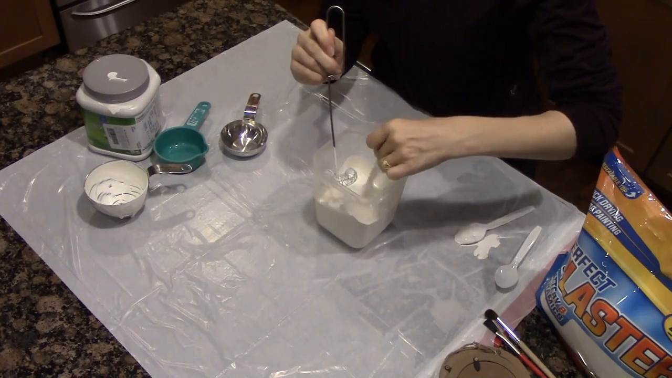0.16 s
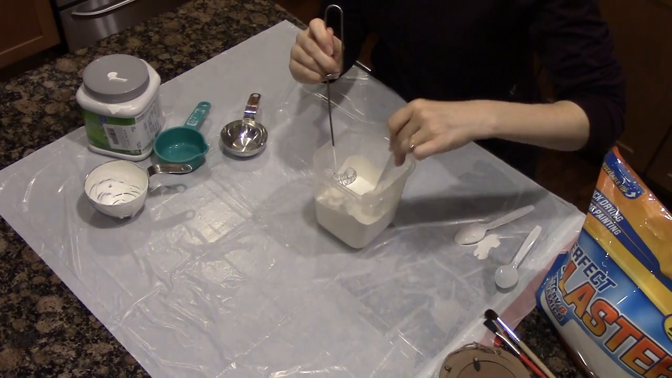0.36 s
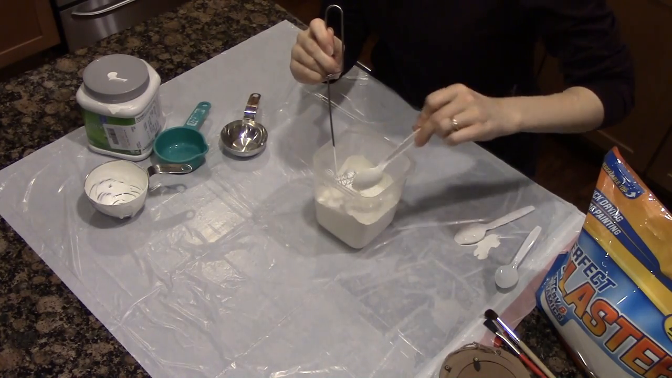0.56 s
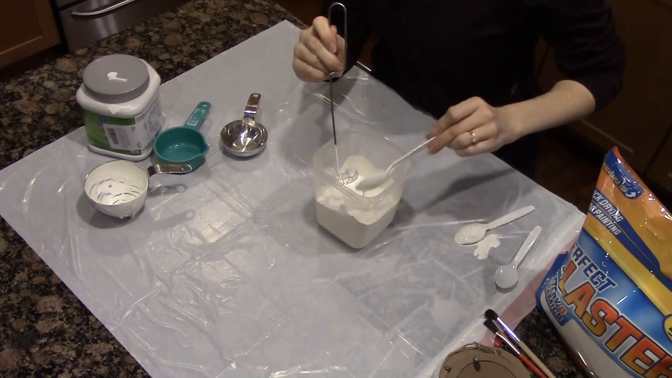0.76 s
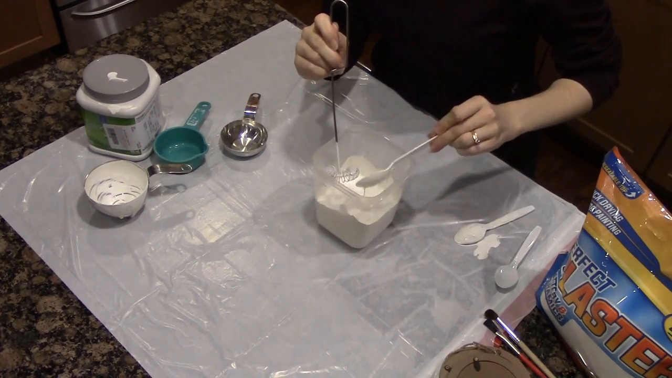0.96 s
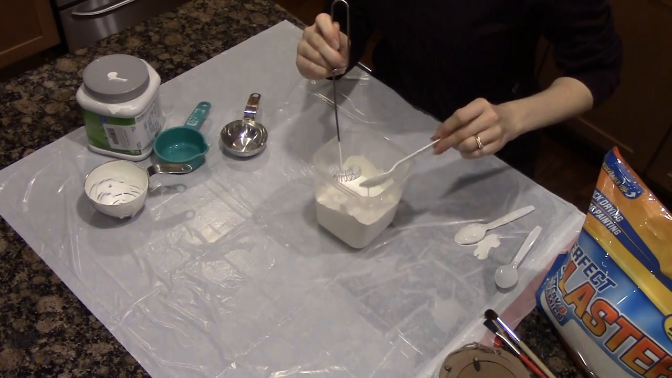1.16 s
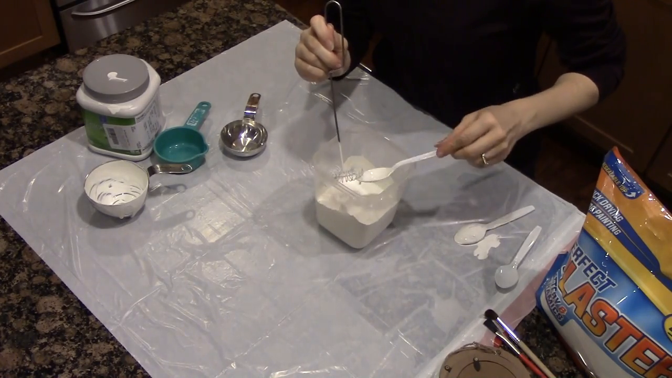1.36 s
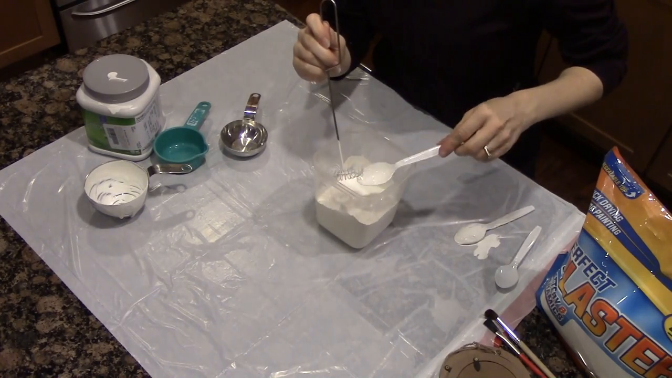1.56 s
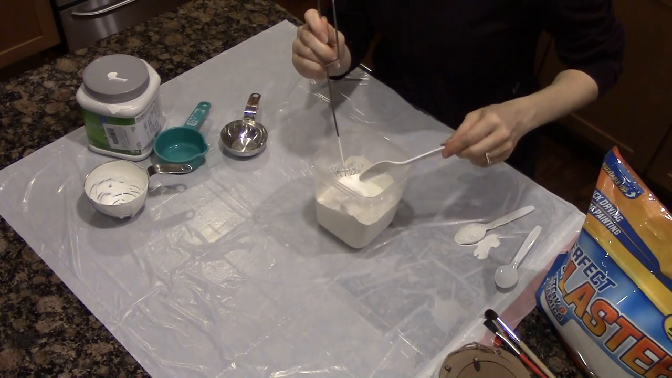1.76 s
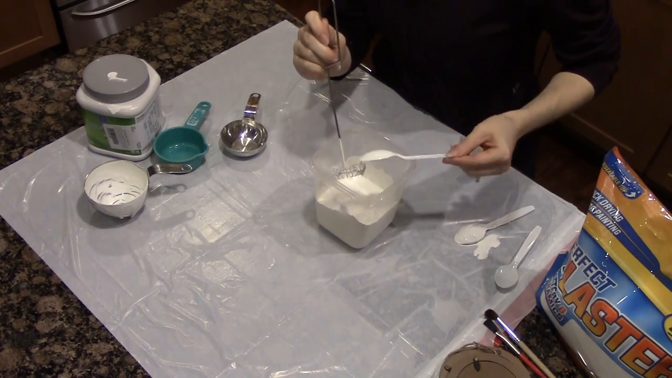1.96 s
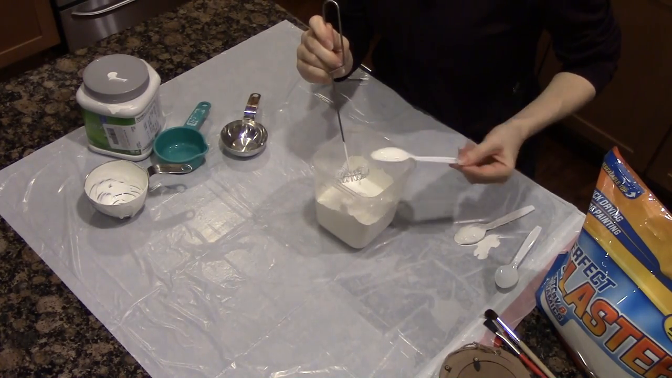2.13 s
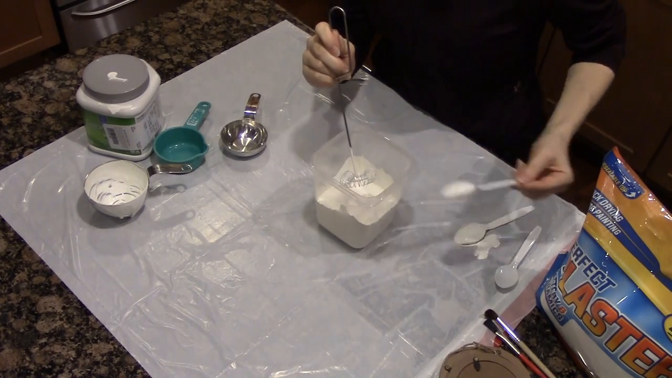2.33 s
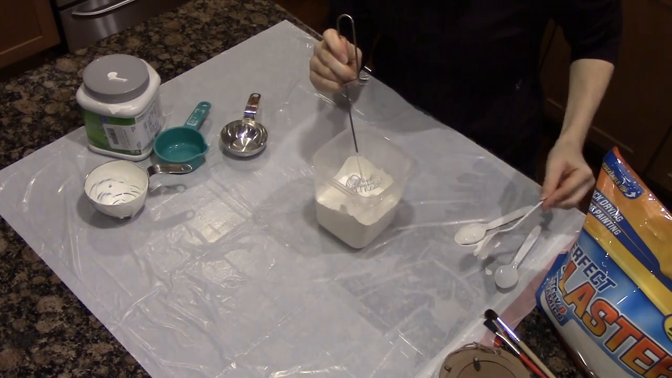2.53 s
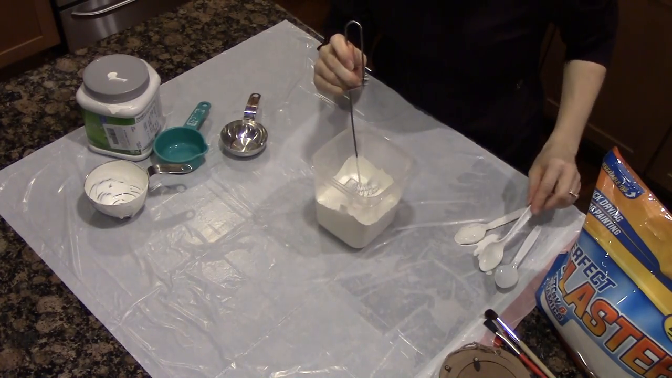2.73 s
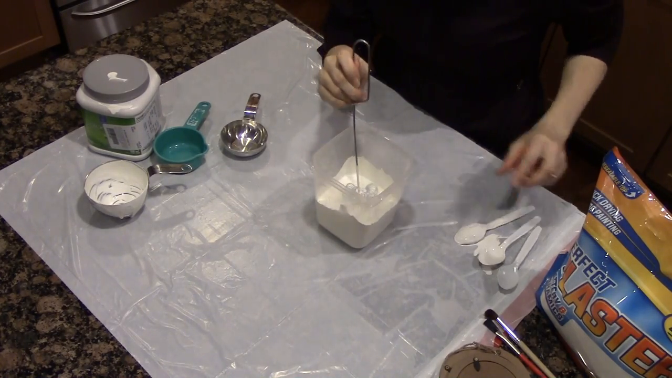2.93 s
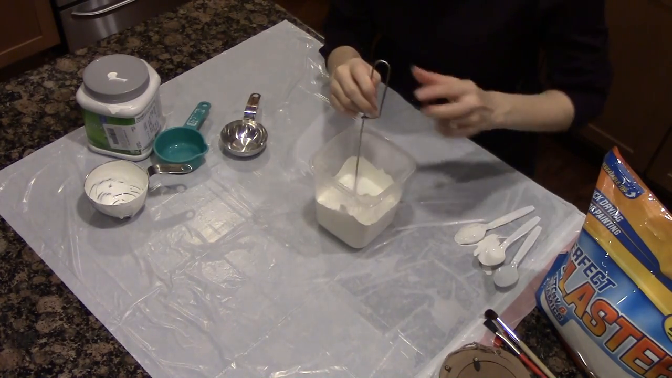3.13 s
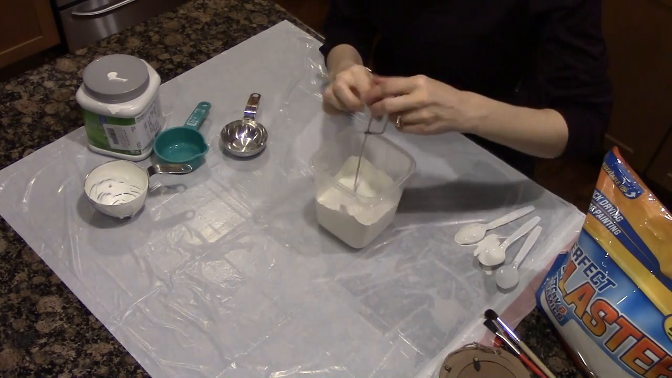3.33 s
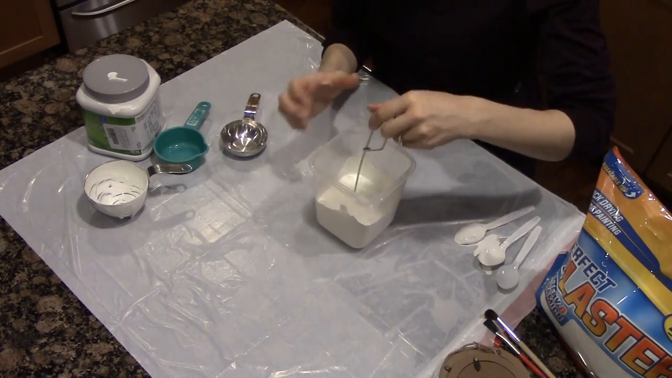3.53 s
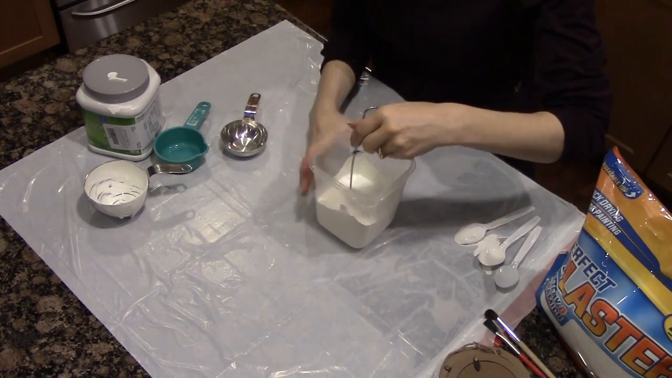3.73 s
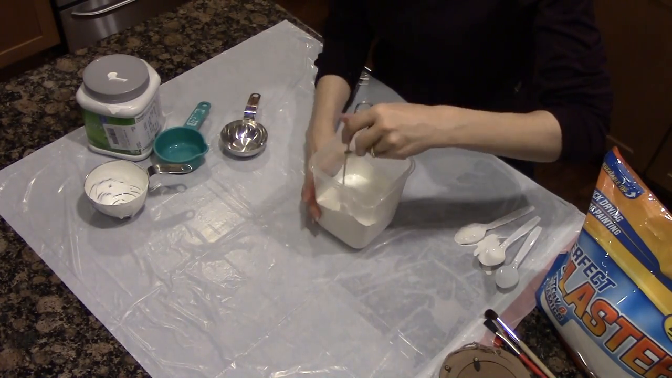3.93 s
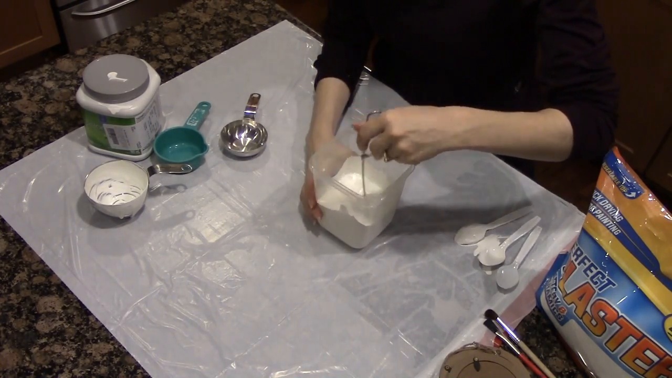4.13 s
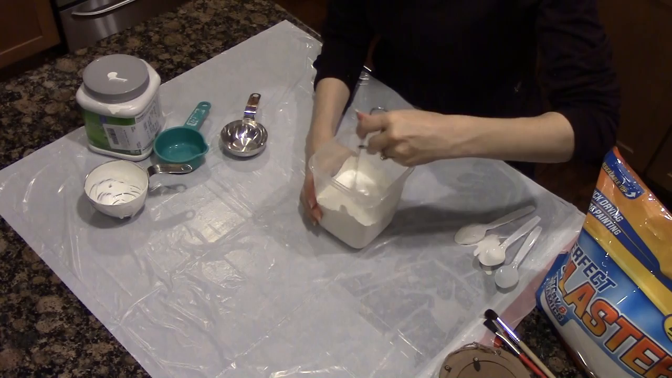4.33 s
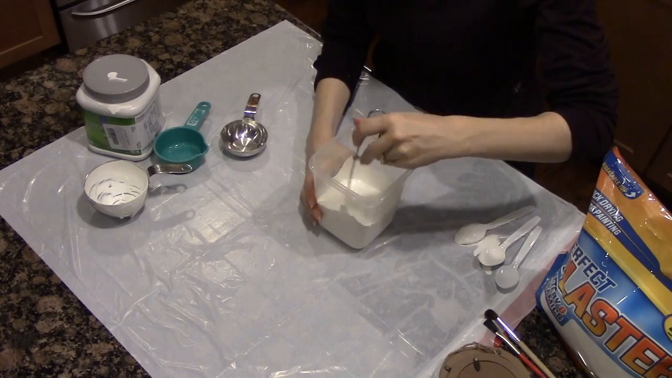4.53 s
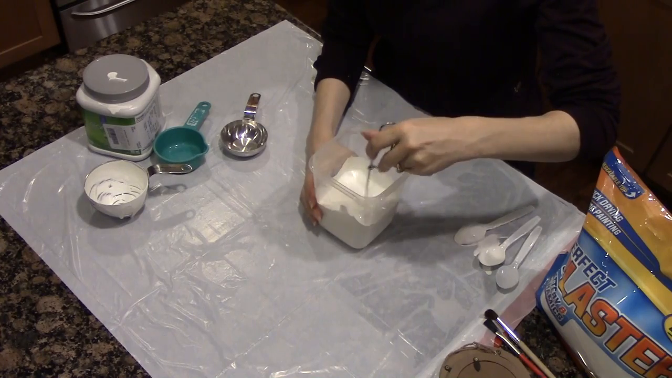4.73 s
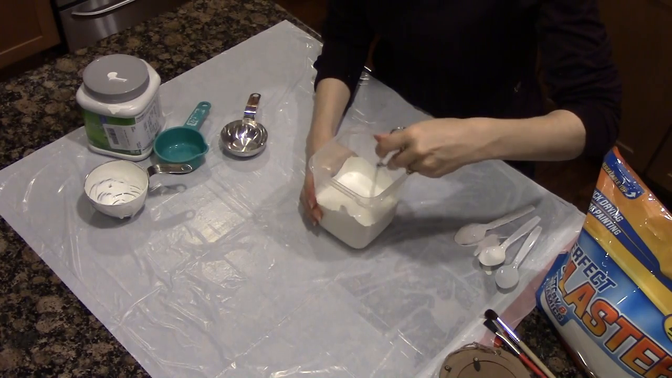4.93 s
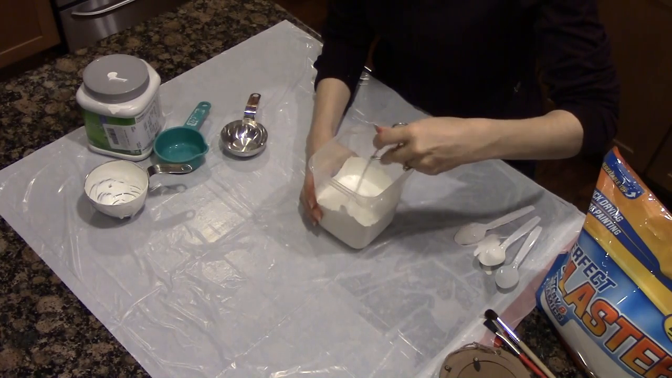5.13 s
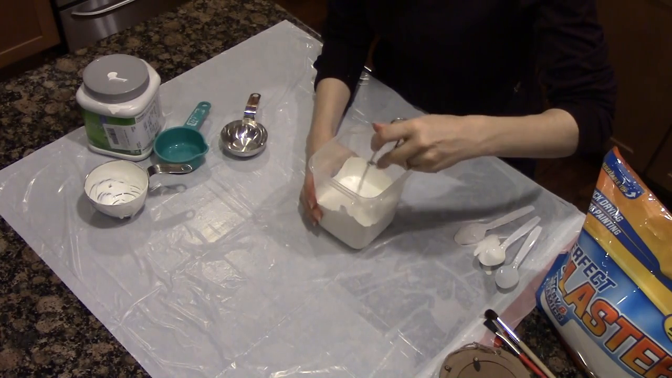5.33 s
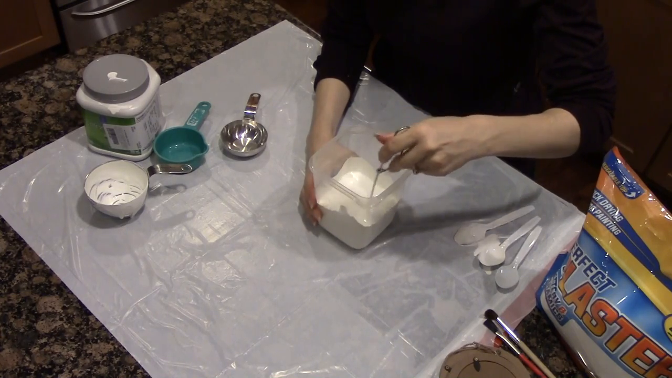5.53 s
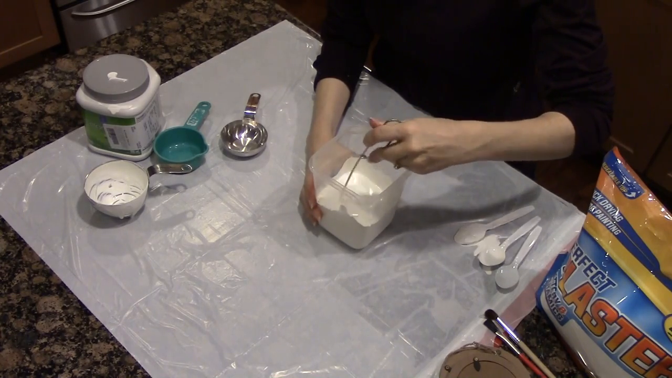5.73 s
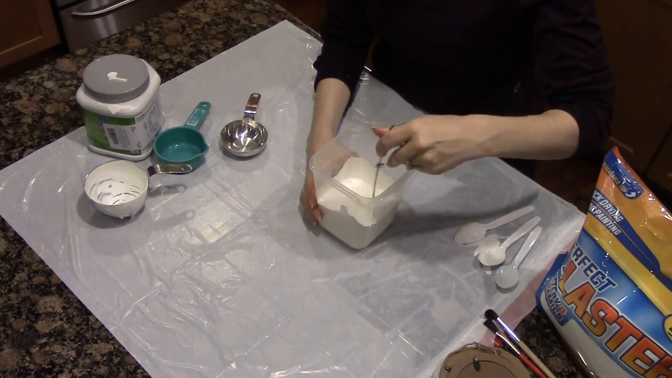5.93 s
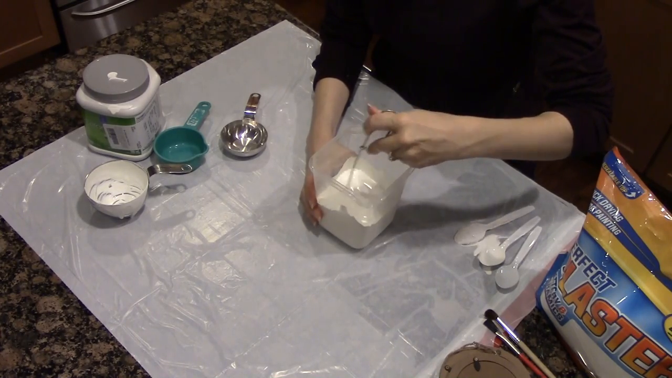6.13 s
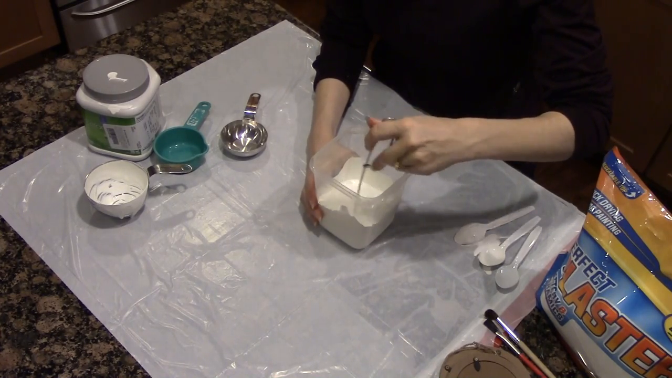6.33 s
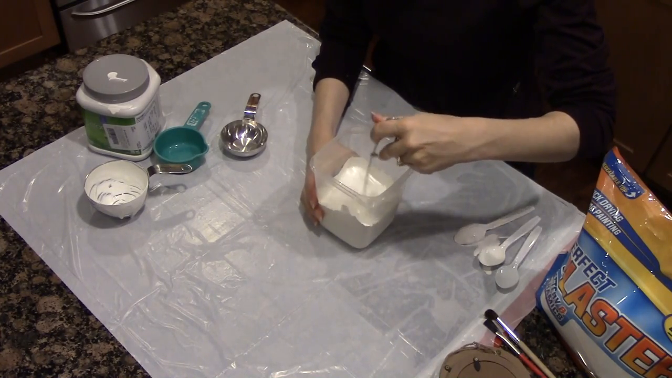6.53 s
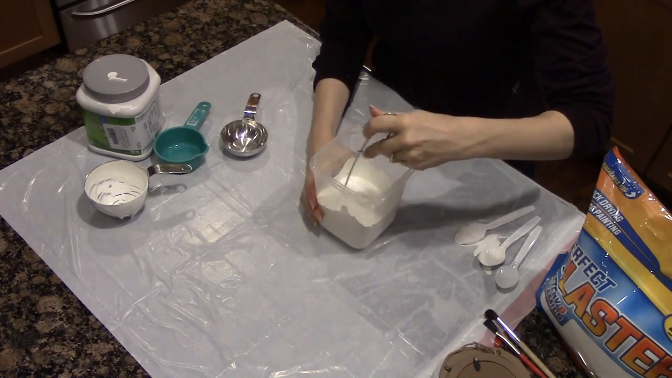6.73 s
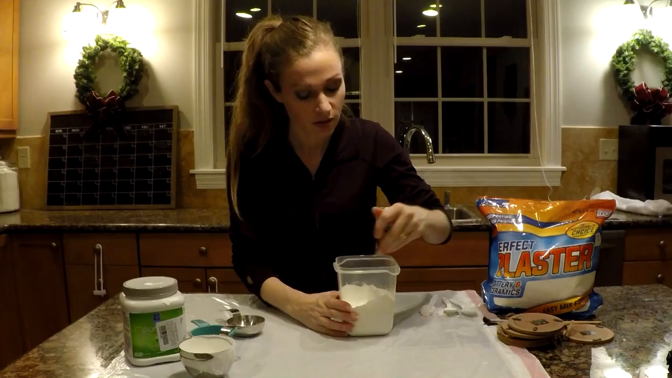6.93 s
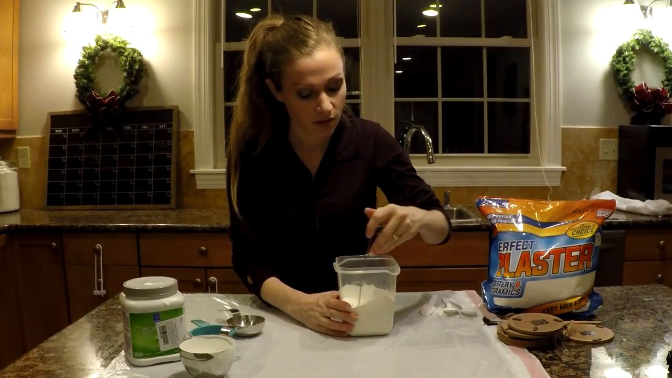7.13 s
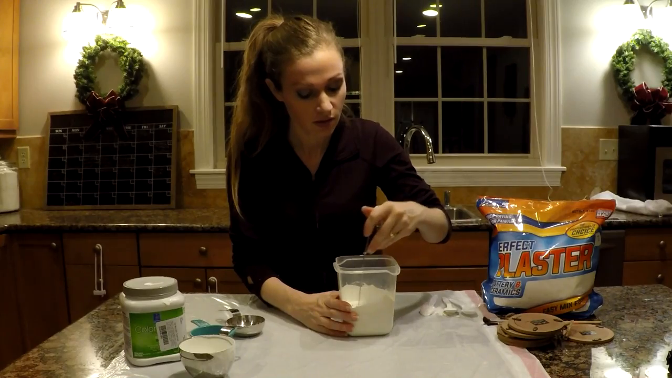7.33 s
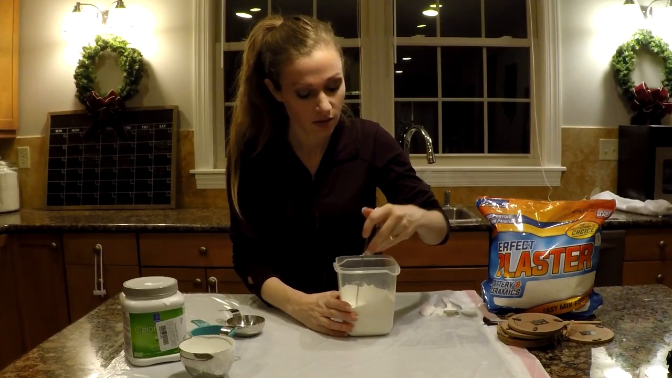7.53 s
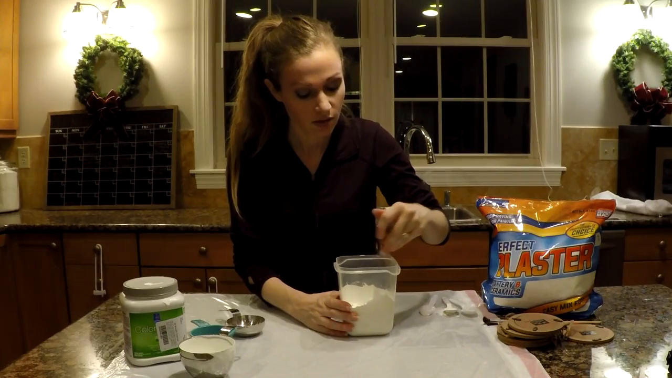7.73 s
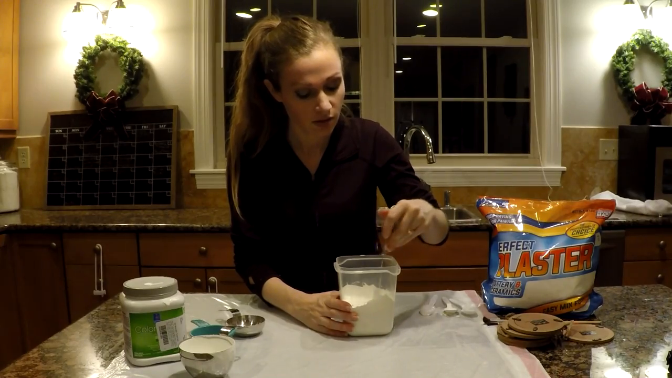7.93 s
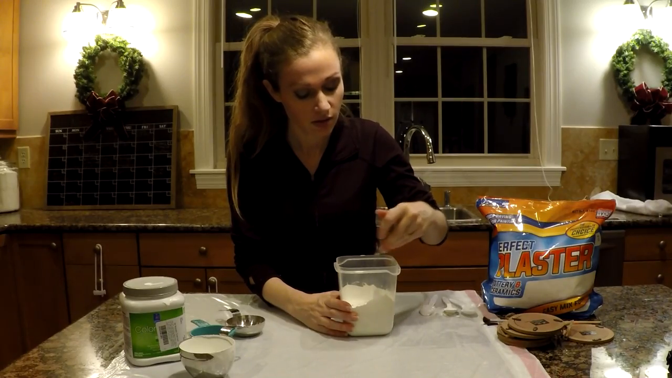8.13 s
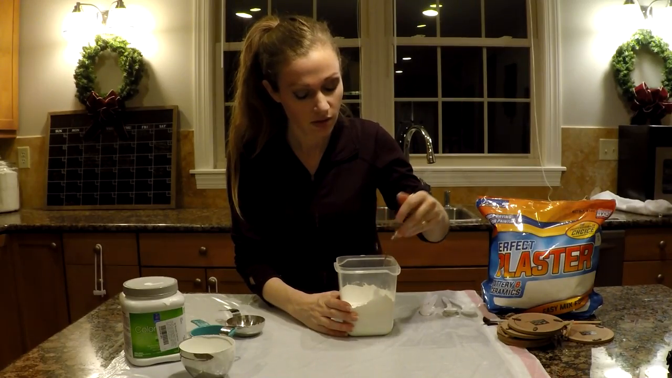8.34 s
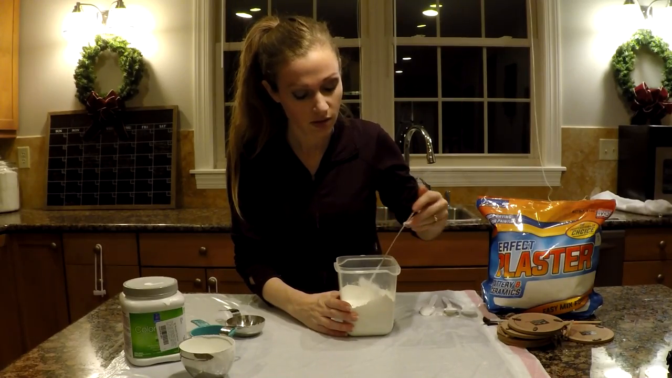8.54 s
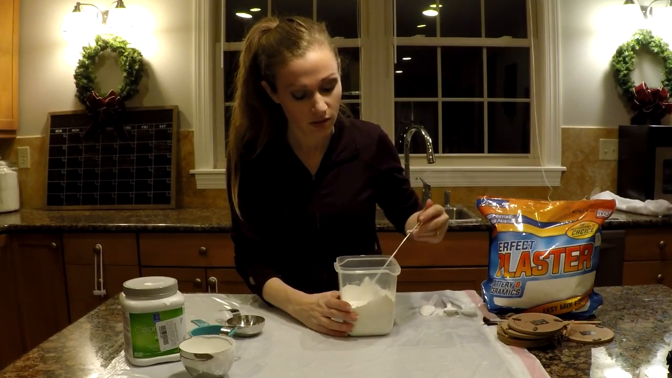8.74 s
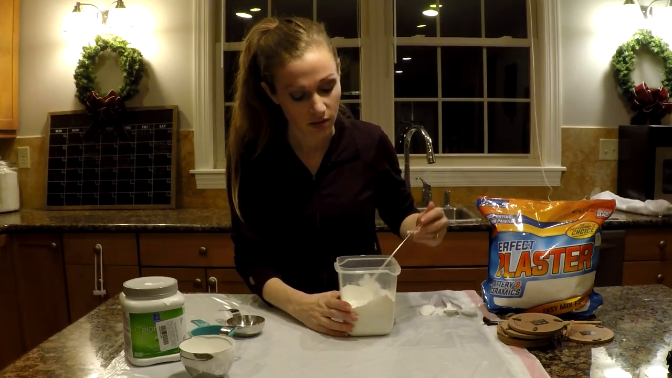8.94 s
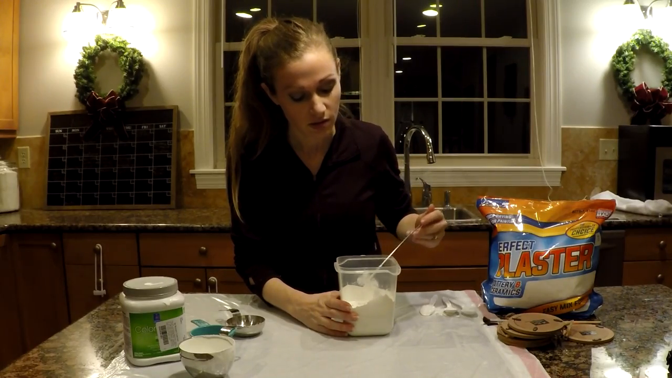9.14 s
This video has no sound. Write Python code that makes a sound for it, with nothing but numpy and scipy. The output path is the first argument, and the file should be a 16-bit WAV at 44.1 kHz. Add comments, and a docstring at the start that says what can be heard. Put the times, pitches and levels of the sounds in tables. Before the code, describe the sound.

A faint steady hum and hiss fill a slightly reverberant kitchen. Between about 0.7 and 1.2 seconds a plastic spoon knocks lightly four times on a plastic tub, with small ticks and faint rubs against whisk wires until 1.6 seconds. Near 2.8 seconds the spoon drops among other spoons with a short, bright clatter. After a couple of soft touches, a wire whisk starts stirring thick paint at about 3.9 seconds. It ticks and clacks unevenly against the tub walls, several times a second, over light scraping and occasional small wet squelches. The stirring eases briefly around 7 seconds, resumes and stops near 8.2 seconds. From 8.7 to 9.1 seconds the whisk raps the rim three times, sharply, with a slight thump through the counter, followed by two faint ticks. The sound is nearer and brighter at first, gradually becoming duller and more distant by about 6 seconds.

```python
"""On a kitchen counter, a plastic tub of thick paint. A plastic spoon is knocked clean on tub and whisk
and dropped among other spoons; a wire whisk then stirs and is rapped three times on the rim. Impacts and
stick-slip friction excite the damped modes of tub, wires and spoons; pockets in the paint resonate as
they close. A far mono microphone hears the room; a near, thinner stereo pair lags 44 ms and fades out."""
import sys
import numpy as np
from scipy import signal
from scipy.fft import rfft, irfft, next_fast_len
from scipy.io import wavfile
from scipy.ndimage import uniform_filter1d

SR = 44100
rng = np.random.default_rng(int(sys.argv[2]) if len(sys.argv) > 2 else 0)


def wrap_up_sound(samples):
    """Save the sound to the file named by the first command line argument, as 16-bit audio."""
    columns = np.atleast_2d(samples).T
    # keep every value between -1 and 1, then stretch to whole-number steps
    tamed = np.clip(columns, -1, 1)
    steps = np.round(tamed * 32767).astype(np.int16)
    wavfile.write(sys.argv[1], SR, steps)


N = 409245
GRIP_S = 2.6   # a hand grips the tub

# Modes of the tub with the whisk in it: f/Hz, level/dB, T60/s
TUB_MODES = [(136, -5.5, 0.094), (283, -18.5, 0.2), (321.7, 2, 0.035), (414, 1, 0.021), (564, 10.5, 0.0058),
             (740, -11.5, 0.17), (855, 12, 0.014), (866, -13.5, 0.11), (902, -14.5, 0.072),
             (952, -15, 0.26), (774, -17, .1), (946, -5.5, 0.0082), (1265, 7.5, 0.01), (1523, -1.5, 0.0072),
             (1578, 6.5, 0.0062), (1867, 8, 0.0031), (2065, 6.5, 0.0077), (2463, 8.5, 0.0033),
             (2860, -12, 0.063), (2900, -10, 0.035), (2930, 3.5, 0.0025), (3138, 5.5, 0.0058),
             (3385, 4.5, 0.0053), (3593, 7.5, 0.0055), (3873, 3, 0.0071), (4380, 6.5, 0.006),
             (4880, 14, 0.0024), (6010, 13.5, 0.0025), (7030, 10, 0.0035), (8260, 12, 0.0028),
             (10060, 11, 0.0034), (11260, 15, 0.0017), (12250, 12, 0.0014)]
def tub(blow_db=-0.5, free_db=3, gripped_db=-13.5, high_bend=0.047, low_bend=0.053):
    """Modal superposition: blows and slips drive the same modes, each impulse with its own weights."""
    knock_s = np.array(KNOCKS)[:, 0] + .001   # each knock sounds 1 ms after its listed time
    touch_s = np.array(TOUCHES)[:, 0]
    blows = np.round(np.r_[knock_s, touch_s] * SR).astype(int)
    spread_db = np.where(np.arange(len(blows)) < len(knock_s), 1.8, 1.88)
    scatter_db = rng.standard_normal((len(blows), len(TUB_MODES))) * spread_db[:, None]
    grip = amp(np.where(np.arange(N) < GRIP_S * SR, free_db, gripped_db))
    slip_force = scraping()
    wall = np.round(drift(30, np.arange(N) / SR)).clip(-1, 1)   # bent in, at rest or bent out
    wall[blows[:len(knock_s)]] = 0   # knocks land on the stiff rim
    out = np.zeros(N)
    for k, (hz, level_db, t60) in enumerate(TUB_MODES):
        force = slip_force(hz)
        force[blows] += amp(np.r_[knock_levels(hz), touch_levels(hz)] + blow_db + scatter_db[:, k])
        if t60 > .035 and hz > 600:   # the grip weakens lasting modes; lower thuds are the counter's
            force *= grip
        bends = wall * (t60 < .035)   # bending and the load of the paint detune the brief modes
        contact_cycles = 14.8 * (hz / 2000) ** 0.12
        for bend in np.unique(bends):
            bent_hz = hz * (1 + (high_bend if hz > 1500 else low_bend) * bend)
            mode = ring(amp(level_db) * force * (bends == bend), bent_hz, t60)
            out += swell(mode, bent_hz, contact_cycles)
    return out


# Knocks of the spoon, then the whisk, on the rim: t/s, level/dB, hardness/(dB per octave)
KNOCKS = [(0.002, -43.5, -6), (0.684, -28, -2.05), (0.843, -26, -2.1), (1.023, -27, 0.5), (1.197, -31.5, 0),
          (8.703, -27, -0.5), (8.914, -24, -1.6), (9.101, -24, 0)]
# Spectrum of a knock: f/Hz, level/dB
KNOCK_SPECTRUM = [(150, -17), (300, -13), (550, -10), (850, -10), (1500, -17), (2800, -12.5), (8000, -22)]
def knock_levels(hz, pivot_hz=850):
    """Impact excitation: the harder a knock, the more its spectrum tilts towards the treble."""
    _, level_db, hardness = np.transpose(KNOCKS)
    return level_db + at_hz(KNOCK_SPECTRUM, hz) + hardness * np.log2(hz / pivot_hz)


# Touches of wires or spoon on the wall, and their quick echoes 10-18 ms later:
# t/s, level/dB, then relative hollow ring/dB, cluck/dB, clack/dB, snap/dB
TOUCHES = [(0.162, -52, -12, -9, -7, -1), (0.55, -53.5, -10, -13, -12, 12.5),
           (0.772, -68, -5, -10, -14, 10), (1.283, -55.5, -1, -3, 8, 8), (1.465, -49.5, -5, -11, -0.5, 9),
           (2.962, -48, -19, -6, -2, -5), (3.3919, -63, 18.5, 9, -14, -4), (3.835, -47, -9, 1, -5, 1),
           (3.9461, -52.5, 0, 7.5, 5, -9), (4.0359, -34.5, -9, -35, 0.5, -4.5),
           (4.046, -51, -5, -7, -6, -23), (4.1565, -52.5, 12, 12, 0, -13), (4.2061, -44.5, -10, -7, -8, -4),
           (4.25, -48.5, 1, -6, 6, 0), (4.27, -49, -2, -4, -5, -12), (4.313, -54, -4, -18, -12, -12),
           (4.3325, -36, -11.5, -4.5, 1.5, -4), (4.342, -55, -3, -16, 4, -1),
           (4.4191, -41.5, -8, 0, -12, -19), (4.4911, -39.5, -4, -6, -6, -10),
           (4.5539, -47.5, 1, 1, -4, -13), (4.612, -35, -7.5, -19, 4, -4.5), (4.629, -52, 2, -27, 11, -11),
           (4.692, -38.5, -9.5, 0.5, -7, -13), (4.7029, -51, -9, -10, -4, -19),
           (4.7554, -41, -6, -8, -11, -2), (4.864, -47, 3, 6, -8, 2), (4.8786, -38.5, -3, -3, -8, -13),
           (4.945, -40.5, -8, -14, -3, -11), (5.0219, -38, -14, -1, -20, -0.5), (5.1018, -48, 1, -2, 0, -5),
           (5.1397, -47, 5, -1, -5, 7), (5.2145, -40, -1, 2, -5, -11), (5.274, -45.5, -4, 0.5, -10, 9),
           (5.3833, -56.5, 10.5, 7.5, 0, 3), (5.424, -40.5, -0.5, -10, -11, -6),
           (5.4927, -41.5, -1.5, 4, -6, -11), (5.5667, -43.5, -10, 1, -7, 5),
           (5.6552, -46, -4, -0.5, -7, 6), (5.791, -39, -6.5, -17, -14, -3.5),
           (5.9941, -44.5, -4.5, 0, -8, -16), (6.0658, -47.5, -2, -1.5, 0, 10), (6.11, -58, -8, -8, -4, 10),
           (6.1505, -48, 1.5, -12, -1, 6), (6.2803, -52, 10, 7, 3, -10), (6.3188, -38.5, -12, 0.5, -8, -1),
           (6.3938, -44, -0.5, -3, -3, 7), (6.4588, -39, -13, -5, -9, 2),
           (6.4693, -41.5, -10, -6, -10, 1.5), (6.476, -52, -7, -25, -15, -7),
           (6.4838, -50.5, 3, -11, -6, 4), (6.5893, -50, 6, 7, -13, -8), (6.6278, -37.5, -11, -11, -18, -3),
           (6.7037, -46, -8, 3, -6, 8), (6.7852, -34.5, -14.5, -22, -11, -6),
           (6.7957, -44, -27, -22, -19, -2), (6.9136, -45, -5, 7, -13, -1), (6.975, -46.5, -9, -5, -4, 1),
           (7.3101, -50, -1, 7, -17, -1), (7.4271, -39.5, -10.5, 2, -12, -2),
           (7.5665, -36, -4, -11, -34, 3), (7.727, -54.5, -5, 2, -8, 6), (7.7771, -50, 11.5, 9, -7, -5),
           (7.8146, -48.5, 4.5, 1, -1, 5), (7.8315, -35, -11.5, -9, 4, -9), (7.8422, -44, -5, -25, -6, -4),
           (7.9778, -49.5, -4, 3, -16, -14), (8.0107, -53, -7, -7, -17, -21),
           (8.0907, -31.5, -6, -14, -5.5, -14), (8.1015, -43, -8.5, -29, -7, -2),
           (8.1688, -45.5, -14, 1, 2, -8), (9.147, -51, 7, -2, -16, -16), (9.2378, -51, -5, -12, -14, -2)]
# Spectrum of a touch: f/Hz, level/dB, then shares of hollow ring, cluck, clack, snap
TOUCH_SPECTRUM = [(290, -9, 0.59, 0.31, 0.036, 0), (560, -13, 0, 0, 0.072, 0.51),
                  (826, -2, 0.9, 0, 0.0099, 0.082), (1370, -1.5, 0.07, 1, 0.057, 0.16),
                  (2400, 5, 0.12, 0.089, 0.92, 0.01), (3130, 2, 0, 0.0051, 0, 0.09),
                  (3930, -2, 0.17, 0.13, 0.021, 0.08), (6050, -6.5, 0.062, 0.077, 0, 0.72),
                  (9000, -14, 0, 0, 0.15, 1)]
def touch_levels(hz):
    """Modal excitation: each touch or echo drives a mode by a common spectrum plus its own colour."""
    return np.array(TOUCHES)[:, 1] + at_hz(TOUCH_SPECTRUM, hz) + touch_colours(hz)


def touch_colours(hz):
    """Spectral weighting: four timbres add, in dB, to the colour of each touch or echo."""
    return sum(at_hz(TOUCH_SPECTRUM, hz, column=c) * np.array(TOUCHES)[:, c] for c in range(2, 6))


# Effort of the wires dragged along the wall: t/s, level/dB
STIR_EFFORT = [(0, -61), (0.12, -74), (.2, -81), (0.27, -90), (0.42, -100), (3.3, -100), (3.88, -74),
               (4.08, -78), (4.27, -61.5), (4.45, -60), (4.62, -63.5), (4.83, -59), (5.02, -62.5),
               (5.25, -67), (5.47, -65), (5.68, -69.5), (5.86, -62.5), (6.05, -57.5), (6.28, -68),
               (6.5, -68.5), (6.81, -75.5), (7.04, -89), (7.34, -68), (7.5, -71), (7.7, -63), (8.04, -61),
               (8.24, -78), (8.4, -100)]
# Spectrum of a slip: f/Hz, level/dB
SLIP_SPECTRUM = [(130, -22.5), (300, -9), (800, -2), (2500, 5.5), (3500, 2.5), (5000, 0.5), (9000, -1.5),
                 (14000, -16)]
def scraping(slips_per_s=900, slip_db=-18.5, drag_db=-12, drag_s=0.011, drag_colour=0.29):
    """Stick-slip friction: random impulses; returns the force on a mode as a function of its frequency."""
    slips = np.flatnonzero(rng.random(N) < slips_per_s / SR)
    t = slips / SR
    touch_s, touch_db = np.array(TOUCHES).T[:2]
    last = np.maximum(np.searchsorted(touch_s, t) - 1, 0)   # a drag follows the last touch or echo
    drag = amp(touch_db[last] + drag_db) * np.exp(-abs(t - touch_s[last]) / drag_s)
    effort = amp(in_time(STIR_EFFORT)[slips]) + drag
    catch_db = 5.5 * drift(25, t)   # the wires catch and let go
    size_db = 4.1 * np.minimum(rng.exponential(1, len(slips)), 2.4)

    def slip_force(hz):
        colour_db = touch_colours(hz)
        tilt_db = at_hz(SLIP_SPECTRUM, hz) + drag_colour * (colour_db[last] - colour_db.mean())
        tilt_db += 2.5 * drift(12, t)   # each stroke has a colour of its own
        strength = effort * amp(slip_db + size_db + catch_db + tilt_db)
        return impulses(slips, strength * rng.standard_normal(len(slips)))
    return slip_force


def thumps(push_db=-5.5, push_s=0.0037, start_hz=1150, end_hz=288, sink_s=0.0052,
           sway_db=-19, sway_s=0.0093, sway_hz=360, sag_hz_per_s=2970, spoon_lighter_db=19):
    """Rigid-body motion: a knock makes the whole tub jump, then rock; both pitches sink as it settles."""
    knock_s, level_db, _ = np.transpose(KNOCKS)
    level_db = level_db - np.where(knock_s < GRIP_S, spoon_lighter_db, 0)
    force = impulses(np.round(knock_s * SR).astype(int), amp(level_db))
    t = np.arange(SR // 10) / SR
    hz = end_hz + (start_hz - end_hz) * np.exp(-t / sink_s)
    push = pulse(2 * t / push_s) * np.sin(2 * np.pi * np.cumsum(hz) / SR)
    rocking_s = np.maximum(t - 0.01233, 0)
    sway_phase = 2 * np.pi * (sway_hz - sag_hz_per_s * rocking_s / 2) * rocking_s
    sway = pulse(rocking_s / sway_s) * np.sin(sway_phase)
    return signal.oaconvolve(force, amp(push_db) * push + amp(sway_db) * sway)[:N]


# Pockets in the paint closing behind the wires: t/s, level/dB, f/Hz, puff length/s
POCKETS = [(4.045, -55, 2900, 0.014), (4.343, -44, 2290, 0.012), (4.612, -39, 2410, .02),
           (4.85, -30.5, 700, .021), (5.108, -32, 710, 0.029), (6.154, -36.5, 2600, 0.017),
           (6.185, -51, 2600, 0.013), (6.211, -48.5, 2170, 0.015), (6.274, -38, 750, .02),
           (6.461, -36, 2450, 0.019), (6.786, -35.5, 2340, .015), (7.778, -32, 700, 0.03),
           (7.835, -46, 2410, .015), (8.098, -42, 2870, 0.012)]
def squelches(cycles=13):
    """Cavity resonance: a puff of noise passes twice through each pocket's resonance and sounds round."""
    out, t = np.zeros(N + SR), np.arange(SR // 5) / SR
    for start_s, level_db, hz, length_s in POCKETS:
        puff = amp(level_db) * pulse(4 * t / length_s) * rng.standard_normal(len(t))
        out[round(start_s * SR):][:len(t)] += 2 * swell(swell(puff, hz, cycles), hz, cycles)
    return out[:N]


# The spoon bounces among other spoons: t/s, level/dB, relative crack level/dB
BOUNCES = [(2.8428, -18, -3), (2.8495, -16.5, -3.5), (2.861, -28, -9), (2.866, -28, -10), (2.8871, -24, -7),
           (2.893, -35, -4), (2.896, -29, -10), (2.968, -41, -17)]
# Modes of the stiff spoons: f/Hz, level/dB, T60/s before t60_scale
SPOON_MODES = [(1950, -18, 0.39), (3570, -14.5, 0.35), (4500, -31, 0.35), (2670, -28, 0.27),
               (5500, -11.5, 0.65), (5575, -12, 0.61), (6520, -8, 0.4), (6700, -8, 0.3), (6900, -10, 0.22),
               (7500, -10, 0.3), (8100, -16, .2), (8210, -2, 0.32), (8400, -4, 0.42), (8900, -4, 0.2),
               (8930, -16, 0.25), (9400, -15, 0.3), (9300, -1, 0.44), (9620, -5, 0.22), (10300, -6, 0.29),
               (10700, -19, 0.16), (11500, -11, 0.21), (11620, -12, 0.19), (11800, -6, 0.25),
               (12300, -7, .2), (12900, -11, 0.22), (13100, -12, 0.18), (13400, -18, 0.13),
               (14500, -20, 0.15)]
# Dull modes of their bowls: f/Hz, level/dB, T60/s before t60_scale
BOWL_MODES = [(370, -17.5, 0.092), (700, -8, 0.059), (1370, -17, 0.025)]
def spoons(ring_db=-13.0, spread_db=3.5, t60_scale=0.091, crack_s=0.0029, clatter_db=-30.0,
           clatter_s=0.034):
    """Damped free vibration: each bounce rings the spoons briefly, with a crack and a duller clatter."""
    bounce_s, bounce_db, crack_db = np.transpose(BOUNCES)
    at = np.round(bounce_s * SR).astype(int)
    modes = SPOON_MODES + BOWL_MODES
    scatter_db = spread_db * rng.standard_normal((len(at), len(modes)))
    out = np.zeros(N)
    for k, (hz, level_db, t60) in enumerate(modes):
        force = impulses(at, amp(level_db + bounce_db + ring_db + scatter_db[:, k]))
        out += ring(force, hz, t60_scale * t60) * (-1) ** k
    hits = impulses(at, amp(bounce_db + crack_db))
    crack = np.diff(noise_bursts(hits, crack_s), prepend=0) / 2
    clatter = filtered(noise_bursts(hits, clatter_s), [1350, 5400], "band")
    return out + crack + amp(clatter_db) * clatter


# The spoon rubs on the wires: t/s, hold/s, level/dB, favoured f/Hz
RUBS = [(0.554, 0.0041, -53, 7630), (1.258, 0.07, -57.5, 6750), (1.6, 0.034, -55.5, 6800)]
# Modes of the whisk's wires: f/Hz, level/dB
WIRE_MODES = [(5380, -2), (5930, -6), (6250, -3), (6730, -4), (7670, -4), (7980, -10), (8550, 1),
              (9520, 3.5), (10600, 4)]
def wires(rub_db=-9.0, slips_per_s=700, t60=0.018, rise_db_per_s=900, fall_db_per_s=700):
    """Frictional excitation: small slips of the spoon feed the wire modes near a favoured frequency."""
    slips = np.flatnonzero(rng.random(N) < slips_per_s / SR)
    t = slips / SR
    start_s, hold_s, held_db, favoured_hz = np.array(RUBS).T[:, :, None]
    rubs_db = held_db - rise_db_per_s * np.maximum(start_s - t, 0)
    rubs_db -= fall_db_per_s * np.maximum(t - start_s - hold_s, 0)
    envelope_db = rubs_db.max(axis=0)   # the strongest rub governs each slip
    centre_hz = favoured_hz[rubs_db.argmax(axis=0), 0]
    out = np.zeros(N)
    for hz, level_db in WIRE_MODES:
        off_centre_db = -23.0 * abs(np.log2(hz / centre_hz))
        strength = amp(envelope_db + rub_db + level_db + off_centre_db)
        out += ring(impulses(slips, strength * rng.standard_normal(len(slips))), hz, t60)
    return out


# Reflections from counter, cupboards and wall: delay/s, level/dB, low-pass f/Hz
ECHOES = [(.0065, -10.5, 12000), (0.0116, -9, 9400), (0.0178, -7, 1500)]
# Reverberation time of the kitchen: f/Hz, T60/s
REVERB_TIMES = [(150, 0.77), (400, 0.51), (1000, 0.62), (2800, 0.46), (7300, 0.3), (14000, 0.22)]
def kitchen(wet_db, echo_db, onset_s):
    """Room impulse response: direct sound, early reflections, then a diffuse tail dying band by band."""
    t = np.arange(SR // 2) / SR
    edges = 80 * 2.0 ** np.arange(9)
    tail = 0
    for low, high in zip(edges, np.minimum(edges[1:], 19000)):
        octave = signal.butter(2, [low, high], "band", fs=SR, output="sos")
        band = signal.sosfilt(octave, rng.standard_normal(len(t)))
        tail = tail + band * amp(-60 * t / at_hz(REVERB_TIMES, np.sqrt(low * high)))
    spectrum = rfft(tail, SR)   # many walls and shelves: no narrow band stands out
    flatten = uniform_filter1d(abs(spectrum), size=400) / uniform_filter1d(abs(spectrum), size=25)
    tail = irfft(spectrum * flatten)[:len(t)]
    response = amp(wet_db) * tail * (1 - np.exp(-(t / onset_s) ** 2))
    response[0] = 1
    for lag_s, level_db, dull_hz in ECHOES:
        click = np.arange(len(t)) == round(lag_s * SR)
        response += amp(level_db + echo_db) * filtered(click, dull_hz, "low")
    return response


# Room tone at the near pair: f/Hz, relative spectral level/dB
PAIR_TONE = [(24, -44.5), (40, -23), (195, 0.5), (413, 2), (2060, -13), (3980, -21.5), (4880, -27),
             (7010, -34), (9000, -38), (11700, -44), (19800, -120)]
# Fade of the near pair: t/s, level/dB
PAIR_FADE = [(0, 0), (1.2, -0.5), (2.9, -5.5), (4.1, -8.5), (4.8, -12), (5.5, -17), (6.2, -27), (7.2, -56)]
def near_pair(x, lag_s=.0442, gain_db=6.5, thin_hz=1800, shadow=0.052, shadow_hz=4000, tone_db=-64.0):
    """Acoustic shadow: in this late, thin, drier pair the left capsule faces away and loses treble."""
    delayed = np.pad(x, (round(lag_s * SR), 0))[:N]
    thin = amp(gain_db) * filtered(delayed, thin_hz, "high")
    mid = signal.oaconvolve(thin, kitchen(wet_db=-34.5, echo_db=-6, onset_s=.011))[:N]
    side = -shadow * filtered(mid, shadow_hz, "high", order=2)
    unshared = kitchen(wet_db=-60.5, echo_db=-99, onset_s=.002)[1:]   # differs between the capsules
    side += signal.oaconvolve(thin, unshared)[:N]
    pair = np.array([mid + side, mid - side])
    pair += amp(tone_db) * np.array([coloured(PAIR_TONE), coloured(PAIR_TONE)])
    return pair * amp(in_time(PAIR_FADE))


# Hum and hiss of the kitchen: f/Hz, relative spectral level/dB
ROOM_TONE = [(8.8, -33), (15, 0), (43, -2.5), (107, -13), (124, -13), (156, -18), (490, -25), (584, -25),
             (1830, -31), (3200, -32), (4820, -33.5), (14700, -43.5), (16500, -37)]
def far_microphone(x, dull_hz=7000, tone_db=-54.5):
    """Convolution with the room: mono, reverberant and a little dull, over steady hum and hiss."""
    roomy = signal.oaconvolve(x, kitchen(wet_db=-32.5, echo_db=0, onset_s=.013))[:N]
    return filtered(roomy, dull_hz, "low") + amp(tone_db) * coloured(ROOM_TONE)


def ring(force, hz, t60):
    """Damped oscillator: a unit impulse starts a decaying sine of height 1."""
    r, w = amp(-60 / (max(t60, .0003) * SR)), 2 * np.pi * hz / SR
    return signal.lfilter([0, np.sin(w)], [1, -2 * r * np.cos(w), r * r], force + 1e-18)


def swell(x, hz, cycles):
    """Resonant build-up, as in a soft contact: peak gain near 1, a 60 dB decay in the given cycles."""
    return 2 * (1 - amp(-60 * hz / (cycles * SR))) * ring(x, hz, cycles / hz)


def noise_bursts(hits, decay_s):
    """Exponential decay: each impulse starts a dying burst of white noise."""
    return signal.lfilter([1], [1, -np.exp(-1 / (decay_s * SR))], hits + 1e-18) * rng.standard_normal(N)


def coloured(spectrum):
    """Spectral shaping: steady noise of the given spectrum, rms 1."""
    size = next_fast_len(N)
    hz = np.maximum(np.arange(size // 2 + 1) * SR / size, 1)
    noise = irfft(rfft(rng.standard_normal(size)) * amp(at_hz(spectrum, hz)), size)[:N]
    return noise / np.sqrt(np.mean(noise ** 2) + 1e-20)


def drift(rate, t):
    """Random modulation: Gaussian points, rate per second, joined by lines."""
    points = rng.standard_normal(round(10 * rate) + 2)
    return np.interp(t * rate, np.arange(len(points)), points)


def impulses(at, heights):
    """Impulse train at the given samples."""
    train = np.zeros(N)
    train[at] = heights
    return train


def pulse(u):
    """Critically damped envelope, peaking at 1 when u = 1."""
    return u * np.exp(1 - u)


def filtered(x, hz, kind, order=1):
    """Maximally flat filter."""
    return signal.lfilter(*signal.butter(order, hz, kind, fs=SR), x)


def amp(db):
    """Amplitude ratio of a level."""
    return 10 ** (np.asarray(db) / 20)


def at_hz(rows, hz, column=1):
    """Interpolation of a spectrum in log frequency."""
    return np.interp(np.log(hz), np.log(np.array(rows)[:, 0]), np.array(rows)[:, column])


def in_time(rows):
    """Interpolation of a curve at every sample."""
    return np.interp(np.arange(N) / SR, *np.transpose(rows))


def scene():
    """Airborne sound crosses the room; structure-borne thumps come straight through the counter."""
    airborne = tub() + squelches() + spoons() + wires()
    return far_microphone(airborne) + near_pair(airborne) + thumps()


def record(dry):
    """Band limiting: a steep low-pass removes everything above 16.4 kHz."""
    return signal.sosfilt(signal.cheby2(12, 70, 16400, fs=SR, output="sos"), dry)


dry = scene()
out = record(dry)
wrap_up_sound(out)
```